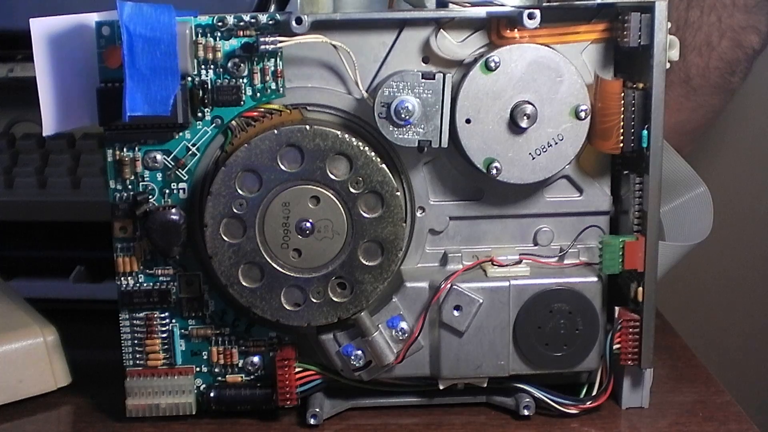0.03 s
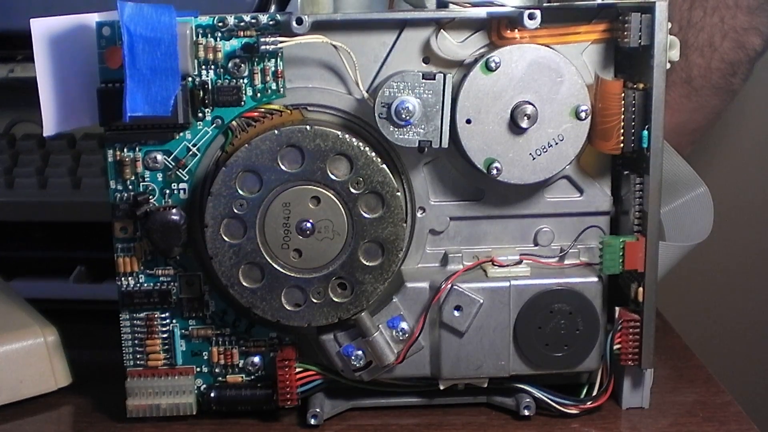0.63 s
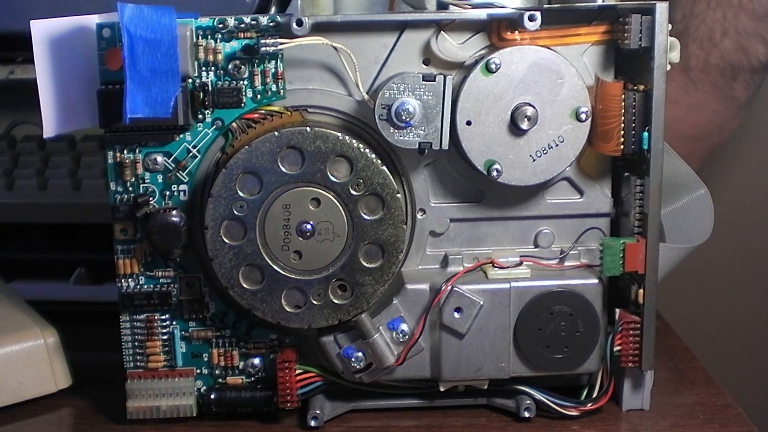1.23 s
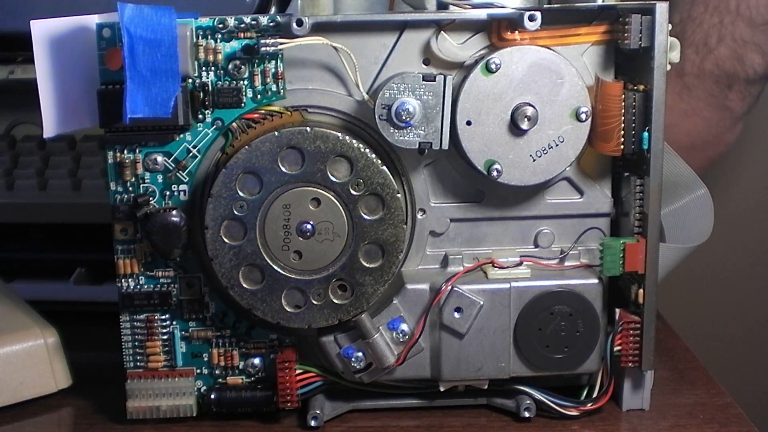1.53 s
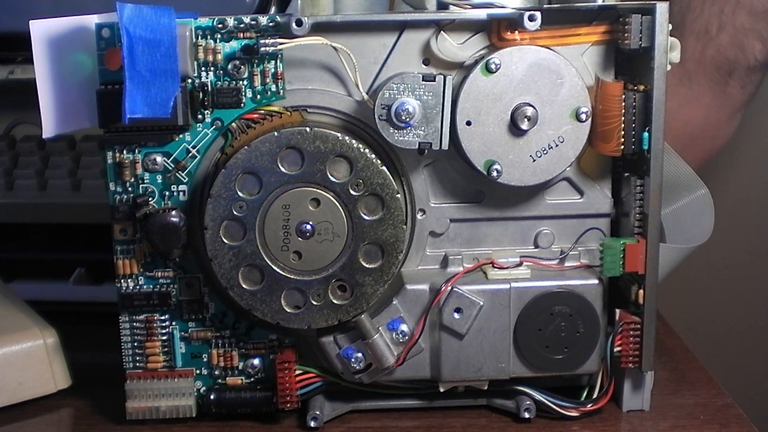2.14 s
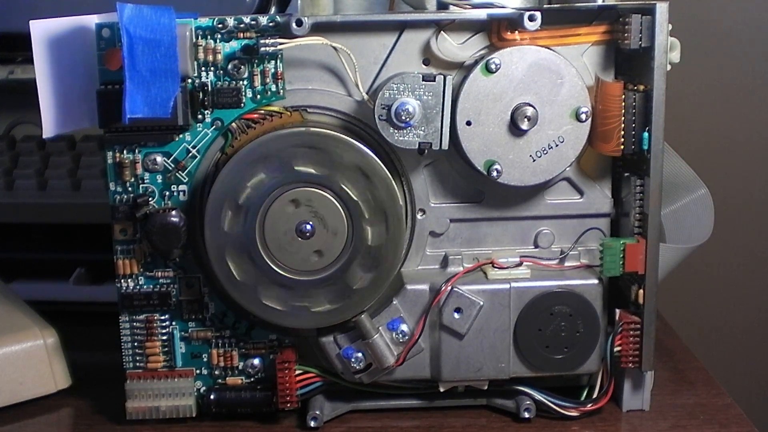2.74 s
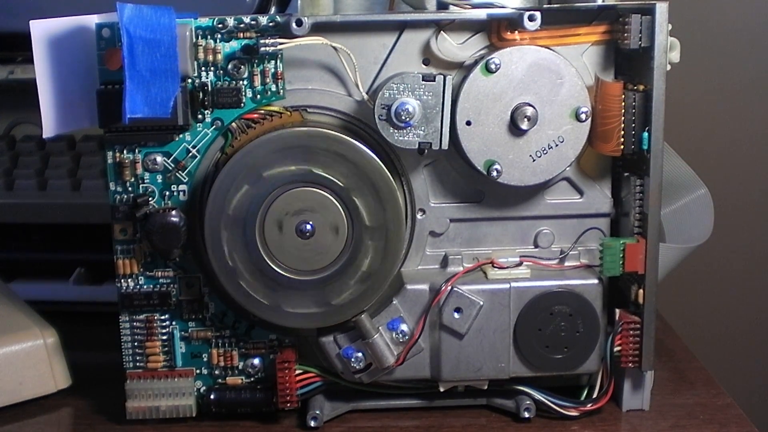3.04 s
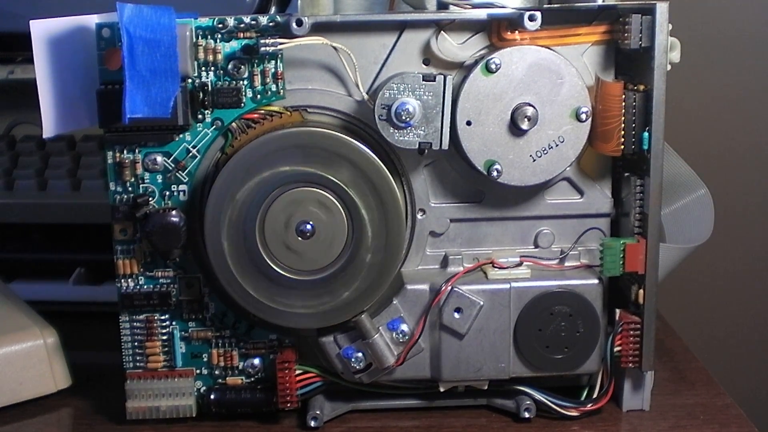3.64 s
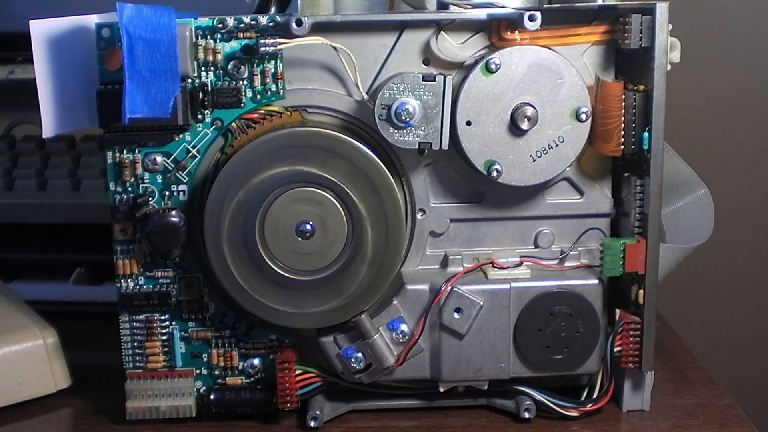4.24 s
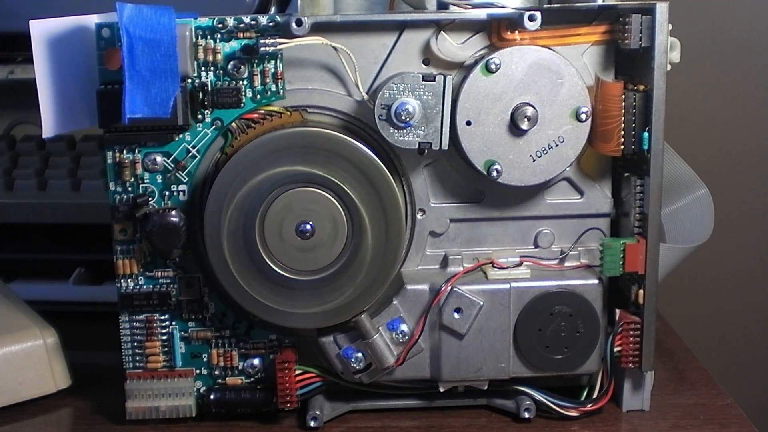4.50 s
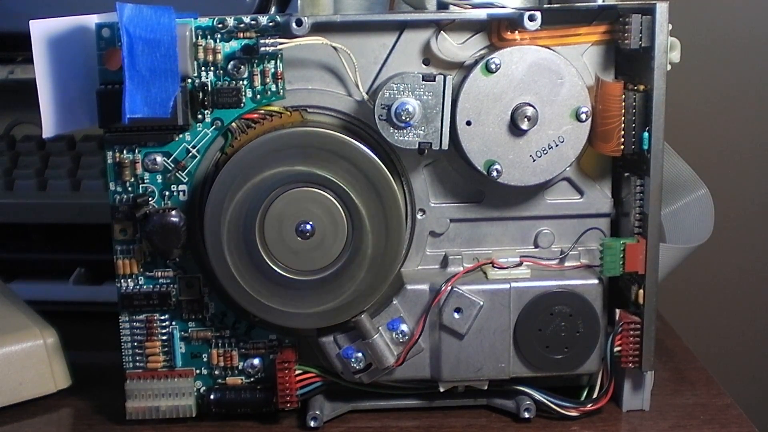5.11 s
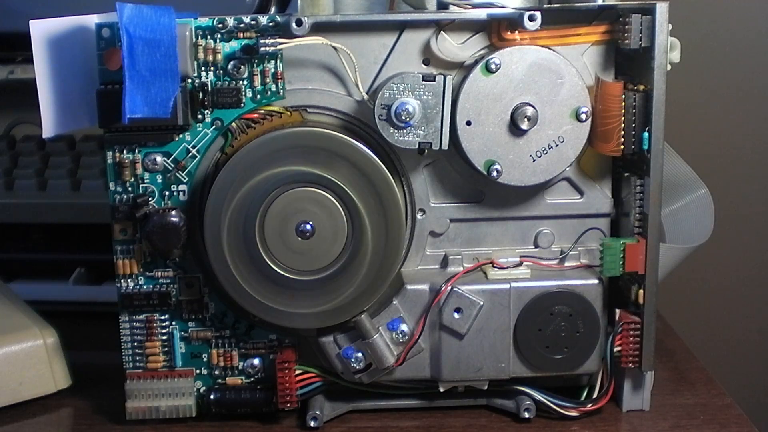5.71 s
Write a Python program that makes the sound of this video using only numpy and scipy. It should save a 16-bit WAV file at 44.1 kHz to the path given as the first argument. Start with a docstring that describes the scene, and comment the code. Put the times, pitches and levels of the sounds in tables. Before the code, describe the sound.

Soft room hiss, a low fan drone and faint, rapid electrical ticking run throughout, heard close to an old, open hard disk drive on a desk. Light ticks of wires come first, then a hand knocks the metal frame at about 1 second and again around 2 seconds, where a switch snaps sharply, followed by smaller clicks. At 2.5 seconds the spindle starts with a dry rubbing hiss and a metallic bearing whir that rises in pitch and grows to the end. At 3 seconds a latch scrapes and the frame rocks on the desk, the loudest event: a run of clattering knocks that get quicker, duller and softer, settling by about 3.6 seconds. A faint, thin whine comes and goes between 3.4 and 4.7 seconds. A low hum, slowly sinking in pitch, swells near 4.4 seconds and eases. At 5.6 seconds the drive gives one dry, jangling clack.

```python
"""An old, open hard disk drive starts up on a desk. Room hiss, a fan and the camera's faint electrical
ticking lay the bed. Leads tick, a hand knocks the frame, a low hum creeps in and a switch snaps. The
spindle starts, its bearings singing ever higher through the metal casting; a latch lets go and the frame
rocks to rest. A thin whine comes and goes while the hum sags, and last, something clacks in the drive."""
import sys
import numpy as np
from scipy import signal
from scipy.fft import rfft, irfft, next_fast_len
from scipy.io import wavfile
from scipy.ndimage import uniform_filter1d

SR = 44100
rng = np.random.default_rng(int(sys.argv[2]) if len(sys.argv) > 2 else 0)


def waveform_to_disk(signal):
    """Save audio, clipped to [-1, 1], as 16-bit WAV at the path in sys.argv[1]."""
    frames = np.transpose(np.atleast_2d(signal))
    scaled = np.clip(frames, -1, 1) * 32767
    samples = np.round(scaled).astype(np.int16)
    wavfile.write(sys.argv[1], SR, samples)


N = 262836
T = np.arange(N) / SR

# stereo width, side against mid: f/Hz, level/dB
WIDTH = [(60, -10), (250, -6), (500, -9), (1000, -5.5), (2000, -2.5), (12000, -1)]
# colour of the room's air: f/Hz, level/dB
ROOM_COLOUR = [(15, -11), (25, -6.5), (64, -4), (97, -12), (114, -1.5), (141, -3), (217, -11), (263, -23.5),
               (344, -8), (489, -8), (677, -15.5), (1020, -18), (1330, -19.5), (3720, -22), (16000, -27)]
# fader ride on the room tone: t/s, level/dB
ROOM_LEVEL = [(.1, -55), (2.0, -50.5), (5.96, -51.5)]
# fan tones, against the air: f/Hz, level/dB
FAN_TONES = [(91.3, -4.5), (150.7, -13)]
# light ticks of leads and fingers: t/s, level/dB, centre/Hz
CLICKS = [(.272, -52, 3000), (0.374, -49, 4000), (0.477, -42, 5300), (.879, -44.5, 5500), (1.14, -47, 7800),
          (1.611, -47.5, 7960), (1.9, -46, 1800), (2.291, -42.5, 4400)]
# modes of the frame on the desk: f/Hz, level/dB, t60/s
FRAME_MODES = [(138, -20, 0.33), (156.2, -9.5, 0.31), (209, -11, 0.22), (312, -16, 0.3), (388, 0, 0.22),
               (411.8, 0.5, 0.21), (438.4, 3.5, 0.12), (475, 4.5, 0.079), (523, -3.5, 0.14),
               (578, -4, 0.11), (712, -13.5, 0.4), (785, -7.5, 0.18), (953, -18, 0.37), (1049, -10, 0.24),
               (1230, -22, 0.63), (1370, -11.5, 0.29), (2185, 0.5, 0.14), (2424, -12, 0.15),
               (2888, -3.5, 0.17), (2676, -12, 0.061)]
# colour of rattling loose parts: f/Hz, level/dB
RATTLE_COLOUR = [(50, -16), (150, -5.5), (280, -15), (450, -3), (800, -7), (1500, -7), (2500, -9.5),
                 (4500, -10.5), (7000, -15.5), (11000, -17), (16000, -28)]
# hand on the frame: t/s, ring/dB, ring length/factor, contact corner/Hz, rattle/dB, tilt/(dB per octave)
KNOCKS = [ (.951, -35, 0.82, 1490, -30, -2), (.999, -39, 1, 895, -47, -0.5),
          (1.028, -45.5, 1.1, 890, -40.5, -10), (1.739, -53, 5.4, 970, -48, -8),
          (1.888, -34.5, 0.25, 467, -49, -14), (1.929, -42.5, 0.69, 513, -48, -8),
          (2.030, -55.5, 7.8, 740, -50.5, -11), (2.221, -41, 2.3, 800, -45, -4.5),
          (2.278, -48.5, 1.14, 600, -43, -1)]
# path of the low hum: t/s, f/Hz, level/dB
HUM = [(1.5, 223, -72), (1.8, 226.1, -57.5), (3.1, 215, -60), (3.8, 213.5, -49), (4.25, 208, -46),
       (4.47, 201, -45.5), (4.68, 198, -57), (5.96, 190, -55.5)]
# switch snaps: t/s, crack/dB, crack centre/Hz, crack width/octaves, housing/dB, housing centre/Hz
SNAPS = [(1.951, -25, 13200, .36, -33.5, 3630), (2.100, -32.5, 9000, 0.68, -36.5, 3140),
         (2.122, -35.5, 10000, 0.21, -40, 2150), (2.874, -36.5, 11000, 0.25, -50, 3080)]
# modes of the switch's spring and shell: f/Hz, level/dB, t60/s
SWITCH_MODES = [(3640, -11, 0.1), (4920, -6, 0.065), (5720, 4, 0.078), (6100, -11, 0.052),
                (8400, -1, 0.055), (10370, -1, .06), (11600, 6, 0.028), (12100, -2, 0.11),
                (12500, -7, 0.086), (13100, 2, .06), (13700, -3, .05), (14100, -2, 0.066), (14150, -2, .07),
                (14400, -2, .07), (14650, -5, .06)]
# resonances of the casting: f/Hz, width/Hz, level/dB
CASTING_PEAKS = [(243, 19, -3.5), (356, 6.7, -25.5), (415, 20.6, 0), (515, 19, -6.5), (680, 62, -8),
                 (733, 10, -2), (981, 24, -5.5), (1124, 30, -9), (1485, 47, -6.5), (1540, 20, -8),
                 (1630, 100, -7.5), (1790, 63, -6.5), (2030, 25, -14), (2260, 28, -8), (2380, 38, -12),
                 (2820, 113, -15.5), (3280, 18, -8.5), (3920, 170, -17.5), (4810, 100, -13),
                 (5380, 140, -21), (8500, 400, -23), (5165, 50, -8.5), (10400, 150, -21), (10930, 240, -22)]
# tones of motor poles (near multiples of five) and bearing balls: order/(cycles per turn), level/dB
SHAFT_ORDERS = [(6, -13), (11.93, 3.5), (15, 3), (16.75, -1.5), (18.6, -9), (19.1, -1), (19.96, -2.5),
                (25, -1), (29, -1.5), (30, -1.5), (35, 4), (41.42, 3), (45.55, 0.5), (47.63, 2.5),
                (50.06, -5), (51.85, 3), (60.08, 0.5), (65.08, -0.5), (70.07, -42)]
# colour of dry rubbing: f/Hz, level/dB
RUB_COLOUR = [(200, -32), (420, 14.5), (900, -1), (2000, -3), (3000, -5.5), (5300, -1.5), (6200, -6.5),
              (10000, -7), (16000, -10)]
# landings of the rocking frame: ring/dB, rattle/dB
LANDINGS = [(-20, -24), (-18, -24), (-25.5, -33), (-28.5, -35.5), (-35.5, -43), (-34, -50), (-45.5, -57)]
# first foot, second foot and rebound, relative to their landing: t/s, ring/dB, rattle/dB
FEET = [(0, 0.5, 0), (.010, -6.5, 0), (.038, -12.5, -12.5)]
# metal parts that jangle with the clack: level/dB, centre/Hz, width/octaves
JANGLE = [(-31.5, 1870, 0.19), (-35, 4100, 0.18)]


def undb(db):
    """Decibels to gain."""
    return 10 ** (np.asarray(db) / 20)


def unit(x):
    """Scale to rms 1."""
    return x / np.sqrt(np.mean(x ** 2))


def curves(table):
    """Each column of a timed table as an automation curve."""
    times, *columns = np.transpose(table)
    return [np.interp(T, times, column) for column in columns]


def colour(points, hz):
    """Gain of an EQ curve (f/Hz, level/dB) at the given frequencies."""
    f, db = np.transpose(points)
    return undb(np.interp(np.log(hz), np.log(f), db))


def bell(centre_hz, octaves):
    """A bell-shaped EQ, as a function from frequency to gain."""
    return lambda hz: np.exp(-.5 * (np.log2(hz / centre_hz) / octaves) ** 2)


def noise(eq, size):
    """Stereo noise of rms 1 shaped by eq(hz), narrow in the bass and wide on top."""
    n = next_fast_len(size, True)
    hz = np.maximum(np.fft.rfftfreq(n, 1 / SR), 1)
    mid, side = rfft(rng.standard_normal((2, n)))
    width = colour(WIDTH, hz)
    pair = (mid + np.array([[1], [-1]]) * width * side) / np.sqrt(1 + width ** 2)
    return unit(irfft(pair * eq(hz), n)[:, :size])


def wander(rate_hz):
    """Smooth random modulation with a spread near 1."""
    points = rng.standard_normal(int(T[-1] * rate_hz) + 2)
    ramps = np.interp(T * rate_hz, np.arange(len(points)), points)
    return uniform_filter1d(ramps, int(SR / rate_hz / 2))


def add(out, s, sound):
    """Mix a sound in at s seconds."""
    i = int(s * SR)
    out[:, i:i + sound.shape[-1]] += sound[..., :N - i]


def attack(t, rise_s):
    """A soft onset from 0 to 1."""
    return 1 - np.exp(-(t / rise_s) ** 2)


def burst(eq, rise_s, decay_s):
    """A coloured noise hit that swells and dies away."""
    t = T[:SR // 3]
    envelope = attack(t, rise_s) * np.exp(-t / decay_s)
    return noise(eq, len(t)) * envelope / envelope.max()


def ring(modes, eq, rise_s, size, length=1, spread=0.21):
    """Struck modes, rms 1 over the first 10 ms; each radiates its own way, so left and right differ."""
    t = T[:size]
    hz, db, t60 = np.transpose(modes)[:, :, None]
    lag = np.arctan(spread * colour(WIDTH, hz)) * (-1) ** np.arange(len(hz))[:, None]
    waves = np.array([np.cos(2 * np.pi * hz * t + side * lag) for side in (1, -1)])
    decay = np.exp(-np.log(1000) * t / (t60 * length))
    sound = (waves * undb(db) * eq(hz) * decay).sum(1) * attack(t, rise_s)
    return sound / sound[:, :SR // 100].std()


def tone(hz, db, flutter_db=3, flutter_hz=25, wobble_rad=0.8, wobble_hz=30):
    """A nearly pure tone that follows a pitch curve, unsteady in level and phase."""
    level = undb(db + flutter_db * wander(flutter_hz))
    return level * np.sin(2 * np.pi * np.cumsum(hz) / SR + wobble_rad * wander(wobble_hz))


def room_tone():
    """The bed: still air, hiss and the wavering drone of a fan."""
    room_db, = curves(ROOM_LEVEL)
    fan = sum(tone(np.full(N, hz), db, flutter_db=0.5, flutter_hz=6.9, wobble_rad=0.5, wobble_hz=11)
              for hz, db in FAN_TONES)
    air = noise(lambda f: colour(ROOM_COLOUR, f), N)
    return undb(room_db) * (air + fan)


def electrical_ticks(rate_hz=46.875, db=-40):
    """The camera's needle-thin ticks, steady and dead centre."""
    pulses = np.zeros(N)
    pulses[(np.arange(.0044, T[-1], 1 / rate_hz) * SR).astype(int)] = 1
    return undb(db) * np.convolve(pulses, [0.068, 1, 1, 0.039], "same")


def clicks():
    """Leads and fingers make light, bright contacts."""
    out = np.zeros((2, N))
    for s, db, centre_hz in CLICKS:
        add(out, s, undb(db) * burst(bell(centre_hz, octaves=0.99), rise_s=0.0013, decay_s=0.0059))
    return out


def reflections(dry, t60=0.6, wet_db=-12, predelay_s=0.017, dull_hz=7000, thin_hz=450):
    """The small room answers with a short, duller tail that carries little bass."""
    t = T[:SR // 2]
    walls = lambda f: 1 / np.sqrt((1 + (f / dull_hz) ** 2) * (1 + (thin_hz / f) ** 2))
    tail = noise(walls, len(t)) * np.exp(-np.log(1000) * t / t60) * (t > predelay_s)
    tail /= np.sqrt(np.mean(np.abs(rfft(tail)[:, :SR // 40]) ** 2))  # unity gain over lows and mids
    return undb(wet_db) * signal.fftconvolve(dry, tail, axes=1)[:, :N]


def frame_hit(ring_db, length, corner_hz, low_cut_hz, rattle_db, tilt_db, rattle_s, contact_cycles=2.34):
    """A blow rings the frame and shakes loose parts; soft contact lasts longer and spares the highs."""
    rise_s = contact_cycles / corner_hz
    low_cut = lambda f: 1 / np.sqrt(1 + (low_cut_hz / f) ** 6)
    contact = lambda f: low_cut(f) / np.sqrt(1 + (f / corner_hz) ** 4)
    tilt = lambda f: undb(tilt_db * np.log2(np.maximum(f / 600, 1)))
    body = ring(FRAME_MODES, contact, rise_s, SR // 3, length)
    rattle = burst(lambda f: colour(RATTLE_COLOUR, f) * low_cut(f) * tilt(f), rise_s, rattle_s)
    return undb(ring_db) * body + undb(rattle_db) * rattle


def knocks(low_cut_hz=370):
    """Knocks too light to move the desk; the hand damps ring and rattle alike."""
    out = np.zeros((2, N))
    for s, ring_db, length, corner_hz, rattle_db, tilt_db in KNOCKS:
        rattle_s = 0.023 * np.sqrt(length)
        add(out, s, frame_hit(ring_db, length, corner_hz, low_cut_hz, rattle_db, tilt_db, rattle_s))
    return out


def hum():
    """A low hum creeps in, swells and eases back as its pitch sags."""
    hz, db = curves(HUM)
    return tone(hz, db)


def switch(rise_s=0.0014, ping_db=-9):
    """The switch snaps over with a crack, its small metal parts ping and its housing knocks."""
    out = np.zeros((2, N))
    for s, crack_db, centre_hz, octaves, housing_db, housing_hz in SNAPS:
        contact = bell(centre_hz, octaves)
        crack = burst(contact, rise_s, decay_s=0.0057)
        ping = ring(SWITCH_MODES, contact, rise_s, SR // 4)
        housing = burst(bell(housing_hz, octaves=1.53), rise_s, decay_s=0.018)
        add(out, s, undb(crack_db) * crack + undb(housing_db) * housing)
        add(out, s, undb(crack_db + ping_db) * ping)
    return out


def casting(hz):
    """The metal casting as an EQ: narrow resonances over a weak, broad floor."""
    peaks = sum(undb(db) ** 2 / (1 + ((hz ** 2 - f ** 2) / (hz * width)) ** 2)
                for f, width, db in CASTING_PEAKS)
    floor = undb(-58) / (1 + hz / 3000)
    return np.sqrt(peaks + floor ** 2)


def shaft_tones(speed, turns, flutter_db=2, slip_rad=0.45):
    """Tones locked to the shaft light up as they sweep through the casting's resonances."""
    grid_hz = np.arange(1, SR // 2)
    response = casting(grid_hz)
    tones = np.zeros((2, N))
    for order, db in SHAFT_ORDERS:
        hz = order * speed
        level = undb(db + flutter_db * wander(11)) * np.interp(hz, grid_hz, response)
        phase = 2 * np.pi * (order * turns + rng.random())
        phase += slip_rad * wander(28)  # slipping balls roughen each tone
        lag = np.arctan(colour(WIDTH, hz + 1)) * rng.choice([-1, 1])
        tones += level * np.sin(phase + np.array([lag, -lag]))
    return unit(tones)


def rolling(pace, shelf_hz=5000):
    """Bearing balls roar through the casting; faster ones strike harder and reach its high resonances."""
    roar = noise(casting, N)
    dull = signal.sosfilt(signal.butter(1, shelf_hz, fs=SR, output="sos"), roar)
    return dull + 1.65 * pace ** 2 * (roar - dull)


def rubbing(age, db=-50.5, wear_db_per_s=3, ring_db=12):
    """Dry rubbing hisses, rings the casting in thin bright bands and slowly wears off."""
    bands = lambda f: np.hypot(1, undb(ring_db) * casting(f) * f / (f + 4000))
    hiss = noise(lambda f: colour(RUB_COLOUR, f) * bands(f), N)
    return undb(db - wear_db_per_s * age) * attack(age, rise_s=0.19) * hiss


def spindle(start_s=2.49, turns_per_s2=11.583, drag_s=30, bearing_db=-48.5, tone_db=-3, rolling_db=-1):
    """The riser: constant torque against weak drag spins up the shaft, and its bearings grow louder."""
    age = np.maximum(T - start_s, 0)
    speed = turns_per_s2 * drag_s * (1 - np.exp(-age / drag_s))
    turns = np.cumsum(speed) / SR
    pace = speed / speed.max()
    load = 1 + 0.017 * np.sin(2 * np.pi * turns)  # the load on the balls swells once a turn
    song = undb(tone_db) * shaft_tones(speed, turns) * pace
    roar = undb(rolling_db) * rolling(pace) * load
    swell = undb(bearing_db) * pace ** 0.42 * attack(age, rise_s=0.28)
    return swell * (song + roar) + rubbing(age) * load


def latch(start_s=2.987, scrape_db=-31.5, drag_db=-26, low_hz=1500, high_hz=11000):
    """A latch slips with a bright scrape and drags against the casting just before the frame tips."""
    out = np.zeros((2, N))
    band = lambda f: 1 / np.sqrt((1 + (low_hz / f) ** 4) * (1 + (f / high_hz) ** 6))
    scrape = burst(band, rise_s=0.00056, decay_s=0.03)
    drag = burst(bell(2200, octaves=1.5), rise_s=0.023, decay_s=0.014)
    add(out, start_s, undb(scrape_db) * scrape + undb(drag_db) * drag)
    return out


def rocking(start_s=3.002, first_gap_s=0.1115, gap_ratio=0.87):
    """The frame rocks to rest, foot after foot; each landing comes sooner, duller and tighter."""
    out = np.zeros((2, N))
    s = start_s
    for k, (ring_db, rattle_db) in enumerate(LANDINGS):
        low_cut_hz = 54.6 + 61 * k  # lighter landings no longer move the desk
        for lag_s, foot_db, shake_db in FEET:
            hit = frame_hit(ring_db + foot_db, length=0.66,
                            corner_hz=700 * 0.88 ** k, low_cut_hz=low_cut_hz,
                            rattle_db=rattle_db + shake_db, tilt_db=-4 - 1.1 * k,
                            rattle_s=0.039 * 0.75 ** k)
            add(out, s + lag_s, hit)
        s += first_gap_s * gap_ratio ** k
    return out


def whine(start_s=3.37, hold_s=0.91, fade_s=0.2, hz=2022, drift=0.005, db=-65):
    """A thin, wandering tone that fades in, holds and fades out."""
    age = T - start_s
    fader = np.clip(np.minimum(age, hold_s + 2 * fade_s - age) / fade_s, 0, 1)
    return fader * tone(hz * (1 + drift * wander(6.5)), db)


def clack(start_s=5.602):
    """A dry clack inside the drive: one blow on the frame, and small metal parts jangle with it."""
    out = np.zeros((2, N))
    hit = frame_hit(ring_db=-26, length=0.52, corner_hz=650, low_cut_hz=480,
                    rattle_db=-30.5, tilt_db=-5, rattle_s=0.025, contact_cycles=1.7)
    add(out, start_s, hit)
    for db, centre_hz, octaves in JANGLE:
        add(out, start_s, undb(db) * burst(bell(centre_hz, octaves), rise_s=0.00065, decay_s=0.013))
    return out


def scene(pan_db=0.25):
    """Hits with room reverb over the dry spindle, drones and bed; the mix leans slightly left."""
    hits = knocks() + clicks() + switch() + latch() + rocking() + clack()
    mix = hits + reflections(hits) + spindle() + hum() + whine() + room_tone()
    return mix * undb([[pan_db], [-pan_db]])


def record(dry, notch_hz=7850, notch_leak=0.44, open_s=0.08, fade_s=0.035, top_hz=15750):
    """The camera adds its ticking, dips a narrow treble band, opens after a moment and cuts the top."""
    sound = dry + electrical_ticks()
    notched = signal.lfilter(*signal.iirnotch(notch_hz, Q=12, fs=SR), sound)
    dipped = (1 - notch_leak) * notched + notch_leak * sound
    fade_in = np.clip((T - open_s) / fade_s, 0, 1) ** 2
    high_cut = signal.ellip(8, .2, 70, top_hz, fs=SR, output="sos")
    return signal.sosfilt(high_cut, dipped * fade_in)


dry = scene()
out = record(dry)
waveform_to_disk(out)
```